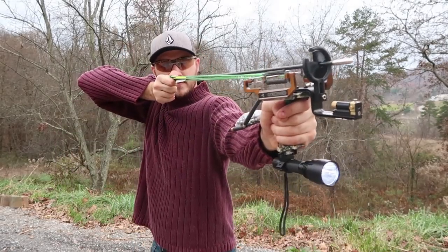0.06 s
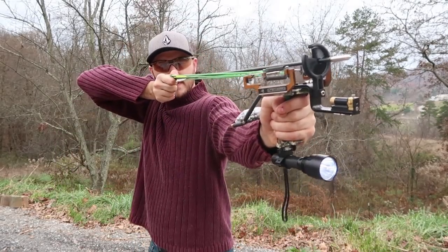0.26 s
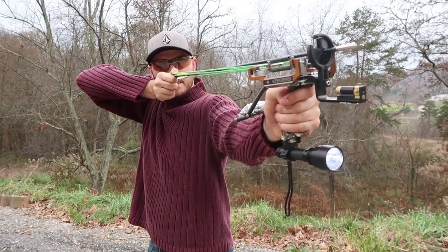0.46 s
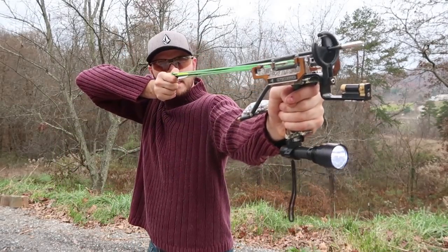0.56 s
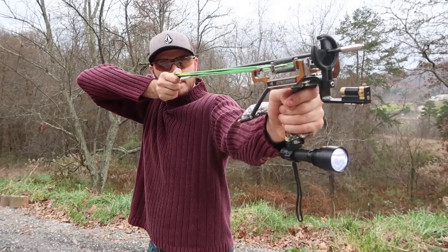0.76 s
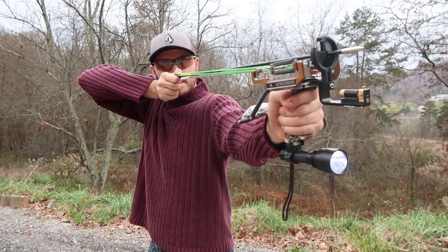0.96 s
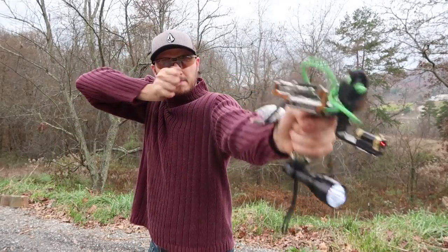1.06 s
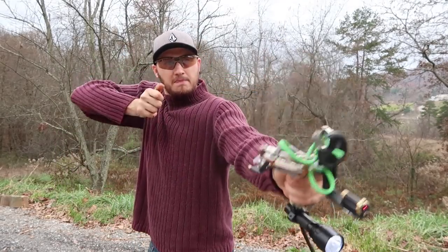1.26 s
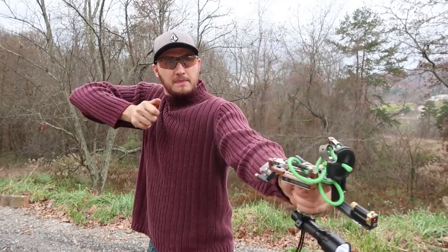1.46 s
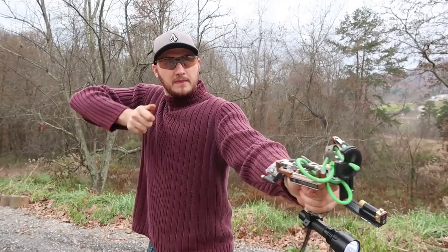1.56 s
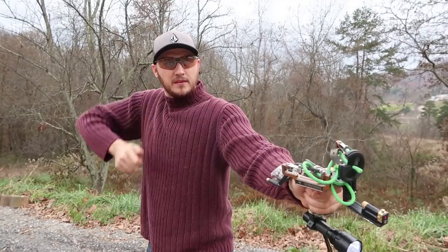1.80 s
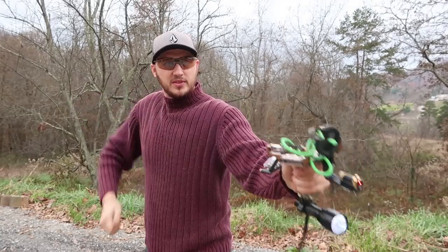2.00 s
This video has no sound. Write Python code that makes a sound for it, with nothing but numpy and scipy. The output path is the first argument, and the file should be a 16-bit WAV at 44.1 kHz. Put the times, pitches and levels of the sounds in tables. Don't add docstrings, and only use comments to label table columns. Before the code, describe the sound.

A slingshot shoots an arrow outdoors, close to the microphone: quiet distant traffic, a bright slap of rubber bands on the frame, fluttering rattle, then a loud thumping crack at the target with quick echoes.

```python
import sys
import numpy as np
from scipy import signal
from scipy.fft import rfft, irfft
from scipy.io import wavfile
from scipy.ndimage import uniform_filter1d

SR = 44100
rng = np.random.default_rng(int(sys.argv[2]) if len(sys.argv) > 2 else 0)


def boost_factor(decibels):
    exponent = np.asarray(decibels, float) / 20
    return 10 ** exponent


def transcribe(u):
    v = np.clip(np.atleast_2d(u).T, -1, 1)
    q = np.round(v * 32767).astype(np.int16)
    wavfile.write(sys.argv[1], SR, q)


N = 89831

# (frequency [Hz], level [dB])
WIDE_COLOUR = [(18, -80), (30, -57.5), (129, -14.5), (355, -0.5), (645, -7.5), (1970, -10.5), (5300, -17.5),
               (11600, -27), (15000, -39.5)]
OPPOSITE = np.array([[1], [-1]])


def unit(x):
    return x / np.sqrt(np.mean(x ** 2))


def along(table, at, log=False):
    x, y = np.array(table, float).T[:2]
    if log:
        return np.interp(np.log(at + 1), np.log(x + 1), y)
    return np.interp(at, x, y, left=-120, right=-120)


def colour(x, table):
    hz = np.arange(N // 2 + 1) * SR / N
    return irfft(rfft(x) * boost_factor(along(table, hz, True)), N)


def band(x, hz, width_hz):
    return signal.lfilter(*signal.iirpeak(min(hz, .45 * SR), hz / width_hz, fs=SR), x)


def decay(t, t60):
    return np.exp(-np.log(1000) * t / t60)


def ring(hz, t60):
    t = np.arange(3 * SR // 100) / SR
    return np.sin(2 * np.pi * hz * t) * decay(t, t60)


def add(track, at_s, x):
    i = int(at_s * SR)
    track[..., i:i + x.shape[-1]] += x


def walk(rate):
    hold = int(SR / rate)
    steps = np.repeat(rng.standard_normal(N // hold + 1), hold)
    return uniform_filter1d(uniform_filter1d(steps, hold), hold)[:N]


def ports(x, side):
    # (frequency [Hz], phase [rad])
    port_lead = [(300, 0), (2400, .12), (3400, .55), (4800, 1.2), (6200, 1.7), (9500, 2.2), (10800, 3.14),
                 (11800, 6.1)]
    pan_db = .8
    n = x.shape[-1]
    hz = np.arange(n // 2 + 1) * SR / n
    turn = np.sign(side) * along(port_lead, abs(side) * hz, True) / 2
    return np.array([irfft(rfft(x) * np.exp(1j * s * turn), n) * boost_factor(s * side * pan_db / 2) for s in (-1, 1)])


def traffic(t):
    # (frequency [Hz], level [dB])
    road_colour = [(18, -41.5), (30, -11), (60, -3), (113, -4.5), (171, -8.5), (680, -14.5), (2030, -27),
                   (12200, -58.5), (15000, -74)]
    # (time [s], level [dB])
    hum_swell = [
        (0, -45),
        (.5, -49),
        (.65, -39),
        (.95, -45),
        (1.2, -54),
        (2.04, -53),
    ]
    road_db, wide_db = -38, -55.5
    hum_hz, hum_width_hz = 119.3, 4.9
    whine_hz, whine_db = 13006, -83

    def flicker():
        octaves_hz = 40 * 2. ** np.arange(9)
        return sum(band(rng.standard_normal(N), f, f / 0.84) * boost_factor(1.2 * walk(11.8)) for f in octaves_hz)

    mid = unit(colour(flicker(), road_colour)) * boost_factor(road_db)
    side = unit(colour(flicker(), WIDE_COLOUR)) * boost_factor(wide_db)
    hum = unit(band(rng.standard_normal(N), hum_hz, hum_width_hz)) * boost_factor(along(hum_swell, t))
    whine = np.sqrt(2) * boost_factor(whine_db + 3.0 * walk(60)) * np.sin(2 * np.pi * whine_hz * t)
    return mid + hum + whine + side * OPPOSITE


def contacts():
    per_s, spread_db = 12000, 2.4
    when, size, sign = rng.random((3, N))
    loudness = boost_factor(-spread_db * np.log(size + 1e-9))
    return (when < per_s / SR) * loudness * np.sign(sign - .5)


def bands_on_fork(t):
    # (time [s], level [dB])
    slap_force = [
        (1.0985, -48),
        (1.1008, -28),
        (1.117, -30),
        (1.1242, -14),
        (1.1256, -3),
        (1.129, -3),
        (1.1302, -15),
        (1.141, -29),
        (1.165, -46),
    ]
    # (time [s], level [dB])
    shiver_level = [
        (1.098, -55.5),
        (1.101, -27),
        (1.145, -42.5),
        (1.165, -45.5),
        (1.2, -29.5),
        (1.228, -45),
        (1.29, -50),
        (1.345, -50.5),
        (1.37, -85),
    ]
    # (frequency [Hz], width [Hz], level [dB])
    fork_modes = [(282, 120, -16), (603, 130, -11.5), (1060, 250, -8.5), (1313, 200, -7), (1909, 170, -2.5),
                  (2340, 200, -1.5), (2950, 220, -4.5), (3790, 600, -4), (4810, 170, -8), (6100, 880, -8.5),
                  (6630, 450, -25.5), (8900, 920, -27.5), (13000, 670, -36)]
    hits = contacts()
    fork = unit(sum((-1) ** k * boost_factor(db) * unit(band(hits, hz, width))
                    for k, (hz, width, db) in enumerate(fork_modes)))
    shiver = unit(colour(contacts(), BAND_COLOUR))
    return fork * boost_factor(along(slap_force, t)) + shiver * boost_factor(along(shiver_level, t) - 1.5)


# (frequency [Hz], level [dB])
BAND_COLOUR = [(470, -45), (800, -10), (2470, 0), (5000, -10.5), (8000, -22.5), (10500, -31), (12200, -27),
               (15400, -33.5)]


def knocks(track):
    # (time [s], peak level [dB], pitch [Hz])
    knock_events = [(.2235, -34.5, 3840), (.2255, -27.5, 2400), (.2295, -34, 2500), (.244, -28.5, 2300),
                    (.247, -37, 6500), (1.1695, -22, 3620), (1.1833, -25, 2250), (1.191, -19, 2960),
                    (1.198, -21, 3460), (1.2008, -31.5, 2460), (1.2105, -27, 2500), (1.221, -31, 3560),
                    (1.2287, -23, 3000), (1.237, -25, 2380), (1.2435, -25.5, 2200), (1.2493, -23, 1760),
                    (1.2585, -32.5, 2930), (1.264, -26.5, 2090), (1.271, -35, 2320), (1.2762, -29, 2550),
                    (1.28, -30, 2480), (1.2838, -24, 2820), (1.289, -28.5, 2170), (1.296, -45, 2520),
                    (1.3025, -28, 3600), (1.328, -44, 3650), (1.34, -33, 3100), (1.4706, -37.5, 3060),
                    (1.7696, -42, 2390)]
    t60_s, rise_s, level_db, tick_db = .009, .00096, -.4, -1.5
    noise = unit(colour(rng.standard_normal(N), BAND_COLOUR))
    for k, (at_s, db, hz) in enumerate(knock_events):
        body = ring(hz, t60_s)
        n = len(body)
        u = np.arange(n) / SR
        rise = 1 - np.exp(-u / rise_s)
        tick = decay(u, t60_s) * noise[k * n:][:n]
        add(track, at_s, boost_factor(db + level_db) * rise * (body + boost_factor(tick_db) * tick))


def slingshot(t):
    # (frequency [Hz], level [dB], t60 [s])
    handle_modes = [(286, -18.5, 0.03), (640, -16.5, 0.019)]
    stop_s, side, wide_db = 1.123, .99, -17.5
    out, wide = bands_on_fork(t), bands_on_fork(t)
    add(out, stop_s, sum(boost_factor(db) * ring(hz, t60) for hz, db, t60 in handle_modes))
    knocks(out)
    return ports(out, side) + boost_factor(wide_db) * np.diff(wide, prepend=0) * OPPOSITE


def target():
    # (frequency [Hz], signed share [1], t60 [s])
    box_modes = [(210, -.55, .0109), (680, 1.81, .0074), (1050, .33, .012), (1510, -5, .004),
                 (1630, 4.12, .0051)]
    # (time [s], thump level [dB], crack level [dB], boom level [dB], side [1])
    echoes = [
        (1.5506, -22.5, -5, -49, 1),
        (1.5560, -23, -19.5, -37, -0.11),
        (1.6099, -26.5, -12.5, -34, -2.34),
        (1.6151, -36.5, -21, -44, -2.5),
        (1.629, -39, -23, -44.5, -1.5),
        (1.658, -37, -24, -47, -1),
    ]
    push_s, ground_lag_s, ground_share = .00063, .00101, .87
    crack_hz, crack_width_hz, crack_db, crack_lag_s = 2700, 2200, -13, .0009
    u = np.arange(SR // 200) / SR

    def push(lag_s):
        return np.sin(np.pi * np.clip((u - lag_s) / push_s, 0, 1)) ** 2

    force = (push(0) + ground_share * push(ground_lag_s)) / push(0).sum()
    pad = np.zeros(SR // 100)
    pad_s = len(pad) / SR
    thump = np.r_[pad, np.convolve(force, sum(share * ring(hz, t60) for hz, share, t60 in box_modes))]
    boom = np.r_[pad, np.convolve(force, ring(208, .019))]
    since = np.arange(len(thump)) / SR - pad_s - crack_lag_s
    out = np.zeros((2, N))

    def strike(at_s, thump_db, crack_trim_db, boom_db, side, t60_s, air_hz):
        noise = band(rng.standard_normal(len(thump)), crack_hz, crack_width_hz)
        noise = unit(band(noise, crack_hz, 2 * crack_width_hz))
        fade = decay(np.abs(since), np.where(since > 0, t60_s, t60_s / 4))
        air = signal.butter(4, air_hz, fs=SR, output="sos")
        crack = boost_factor(crack_db + crack_trim_db) * signal.sosfilt(air, fade * noise)
        add(out, at_s - pad_s, ports(boost_factor(thump_db) * thump - boost_factor(boom_db) * boom + crack, side))

    strike(1.54301, 0, 0, -60, 2.01, t60_s=.0035, air_hz=4340)
    for echo in echoes:
        strike(*echo, t60_s=.011, air_hz=2500)
    return out


def trees(t):
    # (start time [s], level [dB], rise [s], t60 [s])
    washes = [
        (1.547, -25.5, 0.023, 0.101),
        (1.609, -35, 0.0022, 0.12),
        (1.64, -45.5, .02, 0.81),
    ]
    # (frequency [Hz], level [dB])
    tree_colour = [(59, -33), (100, -5), (493, -7), (673, -2.5), (1450, -13.5), (2340, -11.5),
                   (6660, -50.5), (8000, -61), (10400, -100), (17600, -120)]
    shape = 0
    for start_s, db, rise_s, t60_s in washes:
        fade = decay(np.maximum(t - start_s, 0), t60_s)
        shape = shape + boost_factor(db) * fade * np.clip((t - start_s) / rise_s, 0, 1)
    mid, side = (unit(colour(rng.standard_normal(N), c)) * boost_factor(3.7 * walk(250))
                 for c in (tree_colour, WIDE_COLOUR))
    return shape * (mid + boost_factor(-20) * side * OPPOSITE)


def ducking(t):
    # (time [s], depth [dB])
    dips = [
        (1.128, -9),
        (1.544, -1),
    ]
    attack_s, release_s = .01, 10
    return boost_factor(sum(db * np.clip((t - s) / attack_s, 0, 1) * np.exp(-np.maximum(t - s, 0) / release_s)
                   for s, db in dips))


def scene():
    t = np.arange(N) / SR
    return ducking(t) * traffic(t) + slingshot(t) + target() + trees(t)


def low_pass(x):
    return signal.sosfilt(signal.butter(12, 15560, fs=SR, output="sos"), x)


def record(dry):
    knee, top_hz = 6, 15200
    x = dry / (1 + np.abs(dry) ** knee) ** (1 / knee)
    x = signal.sosfiltfilt(signal.butter(6, top_hz, fs=SR, output="sos"), x)
    return low_pass(np.clip(1.05 * x, -1, 1))


dry = scene()
out = record(dry)
transcribe(out)
```